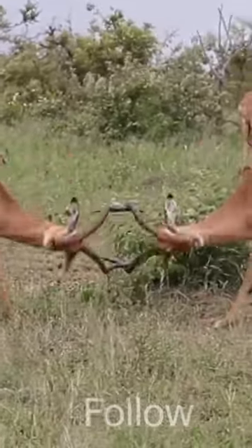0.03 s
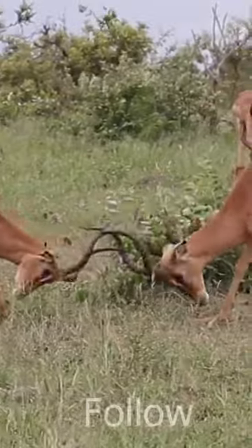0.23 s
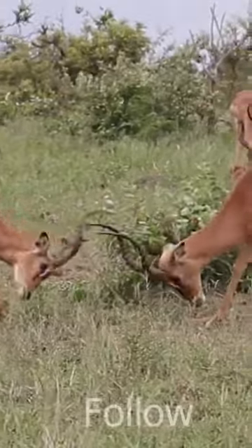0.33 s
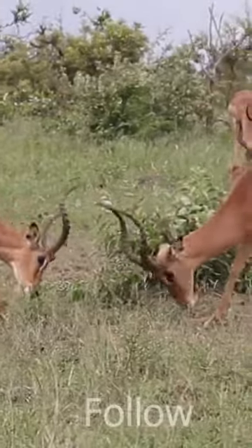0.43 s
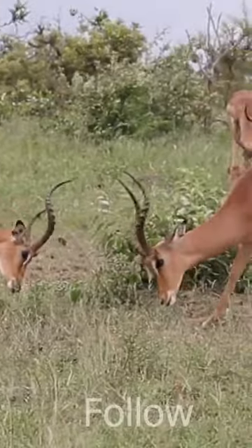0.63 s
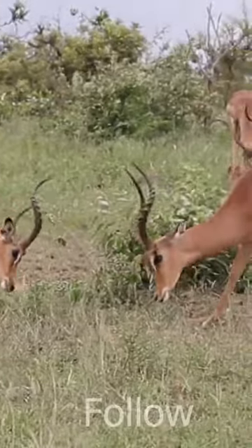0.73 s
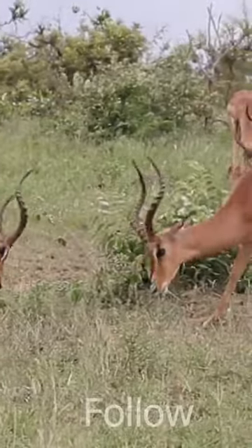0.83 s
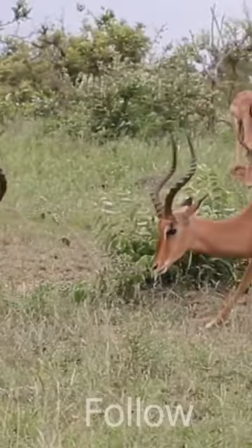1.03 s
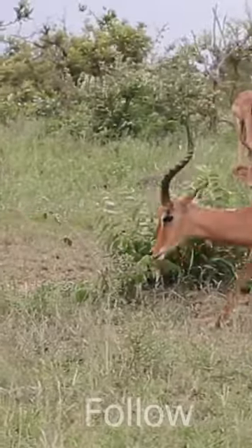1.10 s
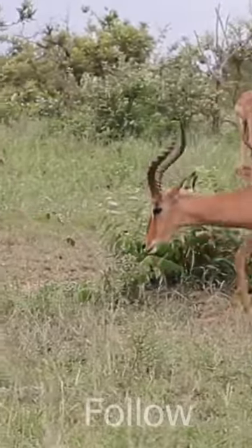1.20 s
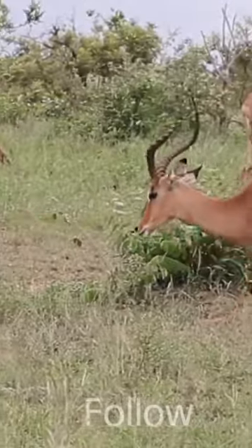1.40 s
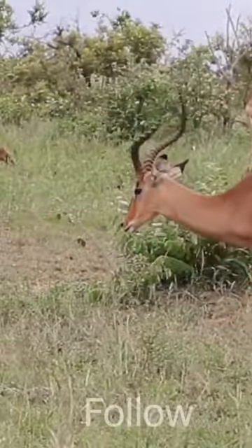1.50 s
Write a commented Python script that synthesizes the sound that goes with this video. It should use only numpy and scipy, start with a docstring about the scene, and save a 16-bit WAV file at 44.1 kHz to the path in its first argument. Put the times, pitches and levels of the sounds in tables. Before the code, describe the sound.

Animal horns clack together in a quick dry run, then rattle lightly, over faint wind.

```python
"""Two antelopes spar with their horns in a grassy clearing. The horns touch and rub, crack together
in a quick run of dry clacks, then a ridged horn rattles along the other as the heads part.
Each clack is a click and its rebound ringing in damped horn. Dry stalks tick underfoot,
grass and bushes scatter each knock, and wind hisses in the leaves throughout."""
import sys
import numpy as np
from scipy import signal
from scipy.fft import rfft, irfft
from scipy.io import wavfile

SR = 44100
rng = np.random.default_rng(int(sys.argv[2]) if len(sys.argv) > 2 else 0)


def master(y):
    """Save y as 16-bit WAV."""
    cut = np.clip(np.atleast_2d(y).T, -1, 1)
    pcm = np.round(cut * 32767)  # scale
    wavfile.write(sys.argv[1], SR, pcm.astype(np.int16))


N = 68355
TIME = np.arange(N) / SR


def from_db(db):
    """Decibels to gain."""
    return 10 ** (np.asarray(db) / 20)


def rms_one(x):
    """Scale to rms 1."""
    return x / np.sqrt(np.mean(x ** 2) + 1e-20)


def cut(x, hz, kind="low"):
    """Second-order low- or high-pass."""
    return signal.sosfilt(signal.butter(2, hz, kind, fs=SR, output="sos"), x)


def resonate(x, hz, q):
    """Resonant band-pass, gain 1 at its centre."""
    return signal.lfilter(*signal.iirpeak(hz, q, fs=SR), x)


def emphasise(x, hz, q, db):
    """Bell EQ: boost or dip by db around hz."""
    w, a = 2 * np.pi * hz / SR, from_db(db / 2)
    k = np.sin(w) / (2 * q)
    return signal.lfilter([1 + k * a, -2 * np.cos(w), 1 - k * a], [1 + k / a, -2 * np.cos(w), 1 - k / a], x)


def add(out, s, sound, db):
    """Place a short sound at s seconds with its peak at db."""
    i = int(s * SR)
    out[i:i + len(sound)] += (from_db(db) * sound / np.abs(sound).max())[:N - i]


def wind():
    """Wind in leaves and grass: a steady, softly fluttering bed of hiss."""
    # tone of the hiss: (frequency [Hz], relative spectral density [dB])
    spectrum = [(15, -77), (25, -22), (59, -19.5), (183, -25.5), (215, -16.5), (281, -22), (567, -18.5),
                (741, -14.5), (919, -8), (1410, -0.5), (1530, -1), (3000, 0), (3930, -4), (7910, -10.5),
                (15500, -17)]
    # slow drift of the wind: (time [s], rms level [dB])
    drift = [(0, -56.5), (.45, -55), (.7, -56), (1.05, -56.5), (1.55, -56.5)]
    hz, db = np.transpose(spectrum)
    bin_hz = np.maximum(np.fft.rfftfreq(N, 1 / SR), 1)
    colour = from_db(np.interp(np.log(bin_hz), np.log(hz), db))
    hiss = irfft(rfft(rng.standard_normal(N)) * colour, N)
    flutter_db = 0.84 * rms_one(cut(rng.standard_normal(N), hz=19.4))
    return rms_one(hiss) * from_db(np.interp(TIME, *np.transpose(drift)) + flutter_db)


def horn_contacts(contacts):
    """A click and a quick rebound ring the damped horn, coloured by the spot and hardness of the hit."""
    # resonances of horn: (frequency [Hz], Q, boost [dB])
    resonances = [(1540, 0.81, 7), (2465, 1.98, 6.5), (3230, 2.06, 8), (4390, 2.08, 10), (5090, 5.4, 3.5),
                  (6180, 2.03, 12), (7480, 15, 4), (9240, 3.4, 11), (12280, 4.4, 9.5), (14800, 3.3, 11)]
    # bending waves smear in time on their way along the horn: (frequency [Hz], Q)
    dispersion = [(3800, 0.84), (7300, 6.4), (9600, 9.8), (12000, 9.1), (13500, 7.6)]
    out, body = np.zeros(N), signal.unit_impulse(SR // 20)
    for hz, q, db in resonances:
        body = emphasise(body, hz, q, db)
    for hz, q in dispersion:
        body = body - 2 * resonate(body, hz, q)  # all-pass: delays this band
    ms = 1000 * TIME[:len(body)]
    for s, db, spot_hz, q, spot_db, bright_hz, rebound_ms in contacts:
        clack = cut(emphasise(body, spot_hz, q, spot_db), bright_hz)
        rebound = from_db(-7.5) * np.interp(ms - rebound_ms, ms, clack, left=0)
        add(out, s, clack + rebound, db)
    return out


def horn_knocks():
    """Horn strikes horn: a light touch, then a run of hard, dry clacks."""
    # hits: (time [s], peak [dB], spot pitch [Hz], spot Q, spot gain [dB], low-pass [Hz], rebound [ms])
    knocks = [ (.0726, -43.5, 4500, 8, 16, 3500, 1.1), (.0745, -37, 1500, 0.82, 14, 2550, 0.87),
              (.2149, -2, 5650, 3.2, 9.5, 12400, .228), (.2302, -32, 3000, 3.1, 1, 9000, 0.22),
              (.2374, -6, 4200, 2.3, 9.5, 9300, 0.036), (.2411, -30, 4400, 5, -3, 7000, 0.51),
              (.2470, -32.5, 3860, 1.7, -9, 5000, .5), (.2541, -0.5, 3410, 2.6, 10, 8900, 1.02),
              (.2546, -11.5, 3640, 3.3, 18, 8850, 0.5), (.2557, -18, 4100, 9, 18, 5950, 0.53),
              (.2579, -11.5, 4640, 4, 5, 5900, 0.4), (.2665, -11, 4800, 2, 17, 9800, 0.26),
              (.2671, -20.5, 4950, 3.6, 4, 13900, 0.25), (.2678, -33.5, 2178, 4.8, 36, 6000, 0.94),
              (.2729, -40, 4500, 2, 6, 9000, 0.54), (.2790, -29.5, 3540, 2, -6, 4960, 0.35),
              (.2854, -13.5, 3130, 1.7, 9.5, 6500, 0.274), (.2997, -43, 1730, 3.7, 16, 3000, 0.5),
              (.3152, -49, 3100, 5, 19, 3000, 0.33), (.3170, -42, 1830, 3, 25, 2520, 1.1),
              (.3297, -35, 1560, 0.5, 25, 2300, 1.54), (.3658, -29, 2550, 0.9, 6, 3860, 0.058),
              (.3688, -34, 4300, 3.9, 7, 6500, 0.434), ]
    return horn_contacts(knocks)


def clearing(x):
    """Skulls, ground and bushes return weak, diffuse reflections, duller and longer with distance."""
    # reflections: (pre-delay [s], 60 dB decay time [s], energy [dB], low-pass [Hz])
    scatter = [(.001, 0.025, -24, 13300), (.008, .16, -35, 8060), (0.026, 0.995, -41, 4930)]
    response = np.zeros(N)
    for delay_s, t60, db, edge_hz in scatter:
        decay = from_db(-60 * TIME / t60)
        tail = cut(rng.standard_normal(N) * decay + 1e-18, edge_hz)
        i = int(delay_s * SR)
        response[i:] += (from_db(db) * tail / np.linalg.norm(tail))[:N - i]
    return signal.fftconvolve(x, response)[:N]


def horn_rubs():
    """Horn slides on horn: dense, tiny slips make a rasp that swells and fades."""
    # slides: (crest time [s], half length [s], rms at the crest [dB], pitch [Hz], Q)
    rubs = [(.114, 0.009, -52, 2190, 5), (0.125, 0.022, -57, 2820, 4.5), (0.232, 0.013, -46, 3800, 1.1),
            (0.28, 0.01, -42.5, 2610, 1.5), (0.517, .017, -44, 3360, 2.1)]
    slips_per_s, spread_db = 5000, 3.5
    out = np.zeros(N)
    for s, half_s, db, hz, q in rubs:
        sizes = from_db(spread_db * np.minimum(rng.exponential(1, N), 4))
        signs = rng.choice([-1, 1], N)
        slips = sizes * signs * (rng.random(N) < slips_per_s / SR)
        rasp = cut(resonate(slips, hz, q), 1020, "high")
        swell = np.exp(-.5 * ((TIME - s) / half_s) ** 2)
        out += from_db(db) * rms_one(rasp) * swell
    return out


def ridge_rattle():
    """The ridges of one horn catch on the other in a fast, light rattle."""
    # catches: (time [s], peak [dB], spot pitch [Hz], spot Q, spot gain [dB], low-pass [Hz], rebound [ms])
    ridges = [ (.4808, -46, 1310, 1.1, 10, 6000, 0.61), (.4873, -29, 2950, 2.6, 5, 10700, 1.05),
              (.4925, -27, 3990, 12, 16, 6000, .5), (.5048, -32, 2210, 1, 24, 11100, 0.55),
              (.5063, -22.5, 4500, 7.6, 10, 5770, 0.35), (.5124, -32.5, 2630, 2.3, -3, 7800, 1.3),
              (.5182, -24, 5900, 1.5, -3, 6800, 0.69), (.5196, -26, 1720, 4.6, 20, 6750, 0.47),
              (.5250, -25.5, 6260, 10, 10, 6900, .8), (.5265, -32.5, 2980, 2.4, -3, 7900, 0.57),
              (.5347, -27.5, 3820, 7.5, 17.5, 7000, 0.78), ]
    return horn_contacts(ridges)


def low_thuds():
    """Two faint, dull low thuds during the rattle."""
    # thuds: (time [s], peak [dB])
    thuds = [(.492, -56.5), (0.533, -58)]
    out = np.zeros(N)
    for s, db in thuds:
        add(out, s, cut(signal.unit_impulse(SR // 20), hz=193), db)
    return out


def stalk_snaps():
    """Dry stalks snap underfoot, each a faint, pitched tick."""
    # snaps: (time [s], peak [dB], pitch [Hz])
    stalks = [(.838, -49, 3970), (0.951, -44, 3000), (1.191, -38, 7700), (1.263, -44, 2800)]
    out = np.zeros(N)
    for s, db, hz in stalks:
        add(out, s, resonate(signal.unit_impulse(SR // 20), hz, q=4.5), db)
    return out


def scene():
    """Horns, thuds and stalks with their reflections, over the wind, in mono."""
    near = horn_knocks() + horn_rubs() + ridge_rattle() + low_thuds() + stalk_snaps()
    return (near + clearing(near) + wind())[None]


def record(dry):
    """A steep low-pass takes off the very top."""
    cutoff_hz = 15600
    return signal.sosfilt(signal.ellip(10, .2, 70, cutoff_hz, fs=SR, output="sos"), dry)


dry = scene()
out = record(dry)
master(out)
```